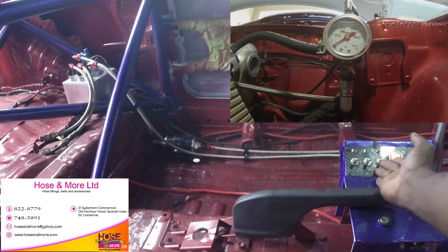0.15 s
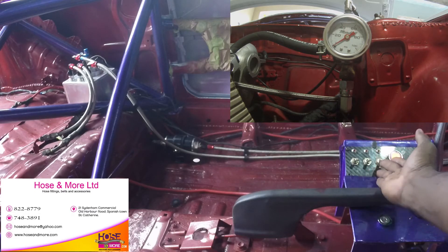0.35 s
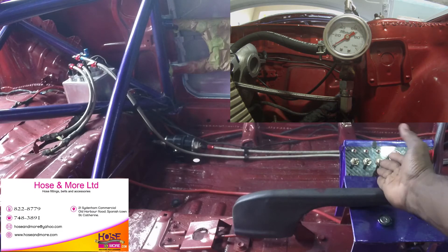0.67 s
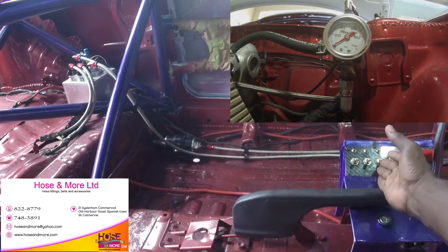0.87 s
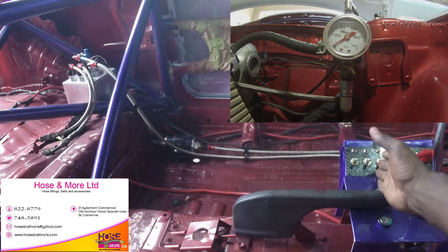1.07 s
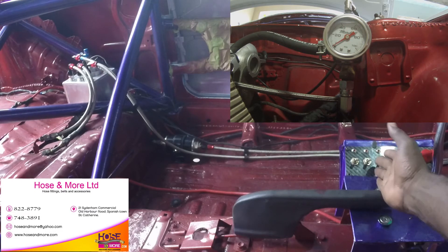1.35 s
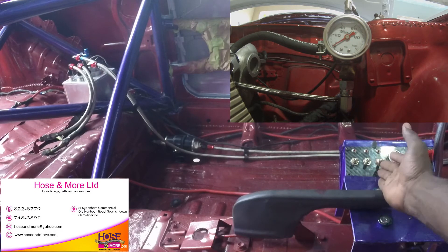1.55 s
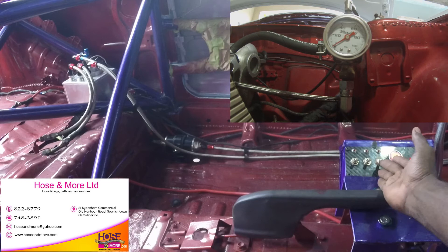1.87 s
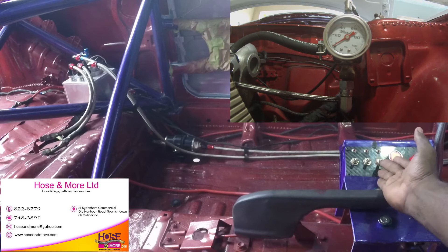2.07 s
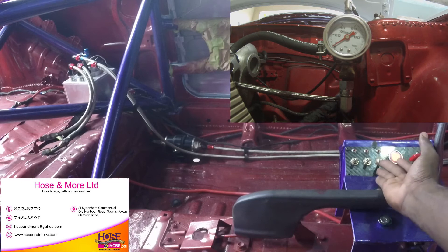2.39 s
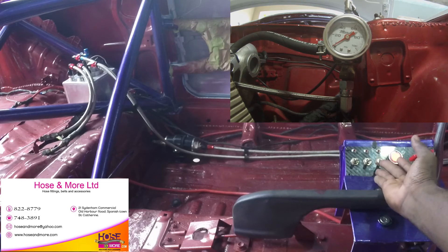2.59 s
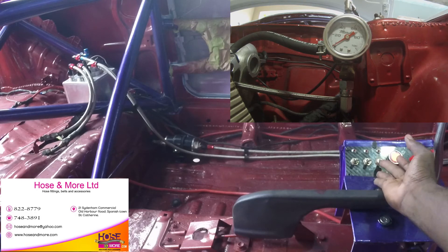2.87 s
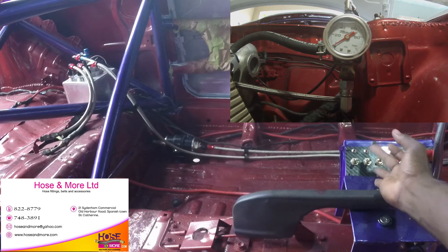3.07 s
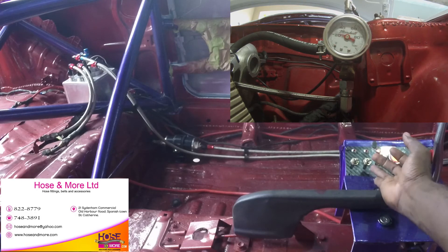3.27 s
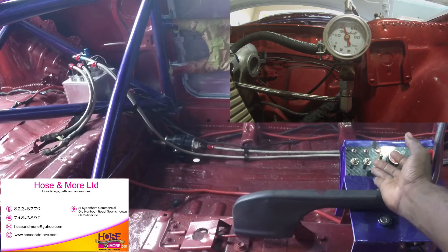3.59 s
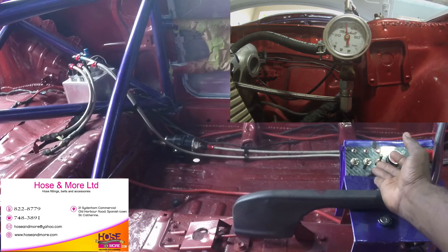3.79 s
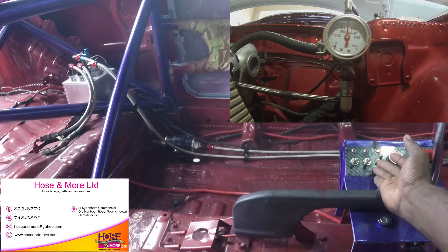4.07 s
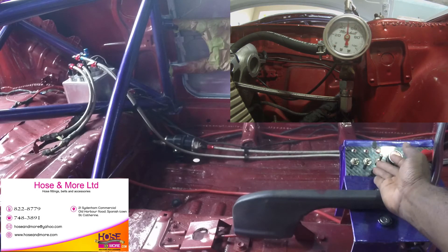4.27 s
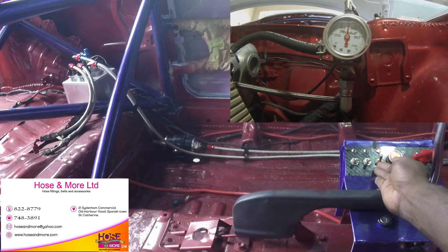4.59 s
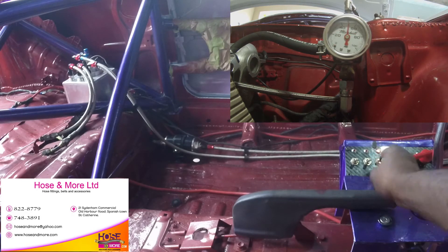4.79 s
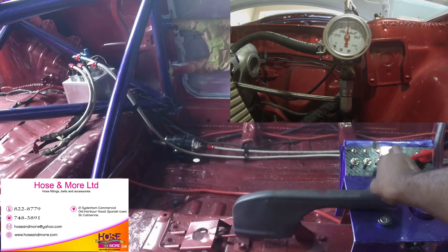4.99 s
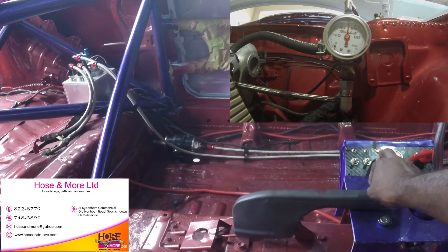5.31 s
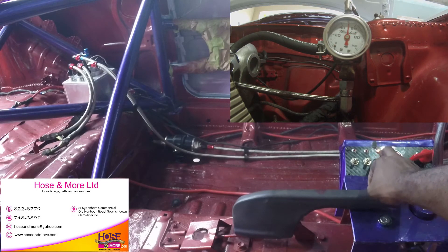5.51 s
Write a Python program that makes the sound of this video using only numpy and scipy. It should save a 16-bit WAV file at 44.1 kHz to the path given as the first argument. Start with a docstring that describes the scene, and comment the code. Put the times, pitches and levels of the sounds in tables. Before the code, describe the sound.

Quiet workshop rumble, a hollow knock and a heavy echoing thud, then a switch snaps and an electric fuel pump whines steadily to the end.

```python
"""An electric roller pump starts in a bare car shell in a workshop: fuel noise, throbbing five times a turn,
drives resonances of tank, floor panels and housing, and sines at shaft multiples whine. Air in the fuel hisses
at first. Before it come knocks on a hollow panel, a heavy thud with echoes from outside and a toggle switch:
ringing modes plus dying noise bands. Low puffs of air hit the microphone later; rumble and hum lie below."""
import sys
import numpy as np
from scipy import signal
from scipy.fft import rfft, irfft
from scipy.io import wavfile
from scipy.ndimage import uniform_filter1d

SR = 44100
rng = np.random.default_rng(int(sys.argv[2]) if len(sys.argv) > 2 else 0)


def transcribe(signal):
    """Save signal, clipped to [-1, 1], as a 16-bit WAV file at the path in sys.argv[1]."""
    frames = np.atleast_2d(signal).T
    limited = np.clip(frames, -1, 1)
    pcm = np.round(limited * 32767).astype(np.int16)
    wavfile.write(sys.argv[1], SR, pcm)


N = 249165
T = np.arange(N) / SR


def pump():
    """Pressure brings in churn and whine; the spinning rotor brings in panel drone and housing ringing."""
    # blend from airy to primed mode levels: time_s, blend_0_to_1
    blend_curve = [(3.2, 0), (3.5, 0.42), (3.7, 0.97), (4.2, 0.82), (4.6, 0.77)]
    pump_on_s, pressure_rise_s, spin_rise_s, air_clears_s = 3.028, 0.073, 0.037, 0.75
    age_s = np.maximum(T - pump_on_s, 0)
    pressure = (1 - np.exp(-age_s / pressure_rise_s)) ** 2.16
    spinning = 1 - np.exp(-age_s / spin_rise_s)
    blend = np.clip(curve(blend_curve), 0, 1)
    bubbles = np.exp(-(age_s / air_clears_s) ** 2)

    turns = shaft_turns()
    throb = 1 + .15 * np.cos(2 * np.pi * 5 * turns) + .05 * np.cos(2 * np.pi * turns)
    noise = rng.standard_normal((4, N)) * throb

    fluid = fuel_churn(noise, age_s, blend) + (1.35 - 0.56 * bubbles) * shaft_whine(turns)
    metal = low_panel(noise) + upper_panel(noise) + pump_housing(noise, blend, bubbles)
    return pressure * fluid + spinning * metal + air_hiss(noise[3], age_s, bubbles)


def shaft_turns():
    """Turns since the start: the integral of shaft speed, which hunts slightly under load."""
    # mean shaft speed: time_s, speed_turns_per_s
    speed_curve = [(3.02, 30), (3.15, 47.8), (3.5, 47.36), (4.1, 47.03), (4.7, 46.93), (5.1, 46.85),
                   (5.65, 46.82)]
    return np.cumsum(curve(speed_curve) * (1 + .0015 * drift(6))) / SR


def fuel_churn(noise, age_s, blend):
    """Churning fuel drives tank and bracket modes, which gather late, over a broad bed between them."""
    # tank and bracket: freq_hz, width_hz, airy_db, primed_db
    tank_modes = [(107, 38, -1.5, -8), (194, 29, -1.5, -28), (534.2, 15.5, 0, -0.5), (571, 3.8, -19, -37),
                  (663.4, 17.6, 1, -3), (677, 6.5, 15, -1.5), (804.5, 26, 0.5, -9.5), (866.5, 27, -3, -3.5),
                  (933, 39, -6.5, -5.5), (968, 20.5, -1, 6.5), (990, 2.9, 14, -5), (1041, 30.7, 1.5, 1.5),
                  (1287, 45, -18, -5), (1367, 21.6, -9.5, -3), (1408, 25, -15, -9.5),
                  (1725, 28, -10.5, -31), (1819, 74, -16.5, -14), (2003, 9.8, -35, -6),
                  (2208, 7.9, -33, -13.5), (2857, 83, -36, -18), (3530, 7.8, -56, -18)]
    # bed between the modes: freq_hz, density_db_per_hz
    bed_spectrum = [(35, -43), (60, -8.5), (150, -11), (240, -9.5), (420, -3), (610, -9), (750, -14.5),
                    (950, -9.5), (1500, -16), (2300, -19), (3900, -27.5), (5200, -31), (5800, -29),
                    (6900, -36), (7400, -34.5), (15500, -74)]
    tank_db, bed_db, tank_wait_s, tank_swell_s = -8.5, -31, .06, .15
    swell = np.clip((age_s - tank_wait_s) / tank_swell_s, .3, 1)
    tank = from_db(tank_db) * swell * shaken(tank_modes, noise, blend, wander_db=1)
    return tank + from_db(bed_db) * colour(noise[2], bed_spectrum)


def shaft_whine(turns):
    """Sines locked to multiples of the shaft speed, each wavering in level."""
    # whine lines: multiple_of_shaft_speed, relative_rms_db
    whine_lines = [(3, -45), (5, -45), (10, -52), (15, -56), (18, -55), (25, -46), (30, -48), (35, -54),
                   (44, -58), (47, -53), (48, -56), (50, -54), (61, -61), (75, -62), (80, -66), (89, -66),
                   (94, -68), (100, -63), (105, -62), (111, -64), (115, -63)]
    whine = np.zeros(N)
    for order, level_db in whine_lines:
        gain = from_db(level_db + 2.1 * drift(5.1)) * np.sqrt(2)
        whine += gain * np.sin(2 * np.pi * (order * turns + rng.random()))
    return whine


def low_panel(noise):
    """Low floor-panel resonances drone with an uneven level."""
    # panel modes: freq_hz, width_hz, level_db
    low_modes = [(297.4, 14.7, -12.5), (321, 5.5, -16.5), (336, 8.9, 2.5), (350.4, 8, -3)]
    # drone level: time_s, level_db
    low_level = [(3.06, -42), (3.11, -30.5), (3.3, -27), (3.36, -29), (3.41, -14.5), (3.46, -32.5),
                 (3.545, -17.5), (3.66, -31), (3.82, -22), (4.08, -28.5), (4.3, -29), (4.52, -30.5),
                 (4.68, -21), (4.76, -26.5), (5.3, -26), (5.55, -34.5), (5.65, -23.5)]
    return from_db(curve(low_level)) * panel_drone(low_modes, noise)


def upper_panel(noise):
    """Upper floor-panel resonances drone with an uneven level."""
    # panel modes: freq_hz, width_hz, level_db
    upper_modes = [(394.5, 26, -2), (418.9, 8.1, 6), (443, 14, -5)]
    # drone level: time_s, level_db
    upper_level = [(3.1, -35), (3.25, -32), (4.05, -33.5), (4.22, -23.5), (4.3, -32), (4.5, -29.5),
                   (4.8, -30), (5.25, -33.5), (5.42, -34), (5.55, -30.5)]
    return from_db(curve(upper_level)) * panel_drone(upper_modes, noise)


def pump_housing(noise, blend, bubbles):
    """Sharp treble modes of the housing; most of the higher ones fade as the air clears."""
    # housing: freq_hz, width_hz, airy_db, clear_db
    housing_modes = [(4050, 50, -31, -36), (4414, 50, -27, -36), (4690, 25, -34, -29), (4915, 30, -30, -24),
                     (5100, 70, -28, -30), (5208, 30, -30, -26), (5300, 50, -29, -29), (5385, 35, -32, -23),
                     (6010, 90, -30, -32), (6120, 120, -36, -31), (6620, 50, -36, -32),
                     (6780, 80, -34, -34), (7770, 60, -38, -35), (8780, 200, -31, -41),
                     (9080, 90, -35, -38), (9800, 150, -36, -41), (10200, 200, -38, -38),
                     (11580, 110, -28, -40), (11800, 90, -31, -42), (12170, 60, -38, -39),
                     (12680, 60, -40, -40), (13050, 120, -34, -38), (13450, 60, -34, -40),
                     (13880, 130, -28, -41), (14120, 60, -34, -40), (14600, 170, -31, -37)]
    level_db = -1 - 4 * (1.5 - blend)
    return from_db(level_db) * shaken(housing_modes, noise, 1 - bubbles, wander_db=1.5)


def air_hiss(noise, age_s, bubbles):
    """Froth noise that fades to a weaker hiss as the last bubbles leave."""
    # froth: freq_hz, density_db_per_hz
    froth_spectrum = [(3500, -22), (6000, -7), (8000, -1), (11000, 2), (15500, -2.5)]
    airy_db, clear_db, rise_s = -49.5, -55.5, .02
    level_db = clear_db + bubbles * (airy_db - clear_db)
    return np.minimum(age_s / rise_s, 1) * from_db(level_db) * colour(noise, froth_spectrum)


def switch():
    """Two bright snaps ring lever and plate; the sheet-metal box answers low."""
    # toggle leaves and lands: time_s, level_db, tilt_db_per_octave above 250 Hz
    snap_blows = [(3.0122, -26.5, 0), (3.0215, -30, -2.5)]
    # snap noise: freq_hz, density_db_per_hz
    snap_spectrum = [(150, -28), (250, -5), (781, -4), (1100, -6), (1890, 0.5), (2850, -7), (3960, -2.5),
                     (5310, -12), (5890, -28), (9070, -9.5), (15500, -31)]
    # snap noise decay: freq_hz, t60_s
    snap_decay = [(250, 0.43), (2000, 0.17), (6000, 0.14), (15000, 0.13)]
    # lever and plate: freq_hz, level_db, t60_s
    toggle_modes = [(796, -2, 0.17), (1217, 2, 0.11), (1750, -3, 0.074), (2540, -18, .08),
                    (3170, 0.5, 0.06), (3810, -1, 0.076), (4479, -16, 0.063), (5440, -4.5, 0.081),
                    (5570, -12, .06), (8260, -3, 0.037), (10500, -9, .03)]
    # sheet-metal box: freq_hz, level_db, t60_s
    box_modes = [(117, -20, 0.12), (156.5, -25, 0.25)]
    box_blows = [(3.030, 0, 0)]   # time_s, level_db, tilt_db_per_octave
    noise = dying_noise(snap_blows, snap_spectrum, snap_decay)
    lever = from_db(-4.5) * struck(snap_blows, toggle_modes, soft_hz=14100)
    return noise + lever + struck(box_blows, box_modes, soft_hz=247)


def thud():
    """A heavy door-like blow on a panel with a ringing latch; its echoes come back duller."""
    # thud and echoes: time_s, level_db, tilt_db_per_octave above 250 Hz
    thud_blows = [(1.373, -22, 0), (1.405, -23.5, -4), (1.438, -27.5, -3.5), (1.48, -44, -1.5),
                  (1.528, -39, -1), (1.603, -30.5, -5.5), (1.635, -37, -14), (1.7, -38, -11),
                  (1.79, -37, -9), (1.88, -39.5, -12)]
    # heavy panel: freq_hz, level_db, t60_s
    body_modes = [(32.8, 0, 0.17), (49, 2.5, 0.13), (75, -3, .12), (150, -6, .1), (218, -11, .1),
                  (294, -11, 0.067), (430, -12, .08)]
    # thud noise: freq_hz, density_db_per_hz
    thud_spectrum = [(12, -30), (20, -1), (106, -9), (140, -1.5), (180, -13.5), (333, -12), (452, -12),
                     (1340, -30.5), (1450, -34), (1870, -32), (3750, -45.5), (9390, -47.5), (15500, -89)]
    # thud noise decay: freq_hz, t60_s
    thud_decay = [(25, 0.95), (100, 0.53), (400, 0.35), (1000, 0.49), (3000, 0.11), (10000, 0.14)]
    # blows on the latch: time_s, level_db, tilt_db_per_octave above 250 Hz
    latch_blows = [(1.373, 0, 0.5), (1.532, -16, -4)]
    # latch metal: freq_hz, level_db, t60_s
    latch_modes = [(1900, -36, 0.066), (2304, -57, .06), (2940, -36.5, 0.036), (5394, -49, 0.083),
                   (8091, -52, .04), (9500, -48, .04)]
    push = struck(thud_blows, body_modes, soft_hz=350)
    noise = dying_noise(thud_blows, thud_spectrum, thud_decay, attack_cycles=0.88)
    return push + noise + struck(latch_blows, latch_modes, soft_hz=12000)


def knocks():
    """A hollow panel rings under a scatter of reflections."""
    # knocks: time_s, level_db, tilt_db_per_octave above 250 Hz
    knock_blows = [(.9322, -22, 0), (.975, -38, -1), (1.155, -34, -8), (1.18, -37, -8), (2.609, -37, -1)]
    # hollow panel: freq_hz, level_db, t60_s (struck() limits it to 0.4 s)
    knock_modes = [(678, -8, 0.15), (770, 6, 0.089), (932, 1, 0.21), (1110, 4.5, 0.07), (1470, -14, 0.98),
                   (1840, -29, 0.33), (2310, -21, 0.25), (2860, -10, 0.13), (3332, -37, 0.26)]
    # reflections: freq_hz, density_db_per_hz
    knock_spectrum = [(88, -36), (200, -16), (500, -10), (900, -9), (1400, -8), (2200, -21.5), (3300, -42),
                      (4300, -77), (9000, -65), (19800, -100)]
    # reflection decay: freq_hz, t60_s
    knock_decay = [(150, 0.36), (1000, 0.23), (3000, 0.041), (9000, .1)]
    rings = struck(knock_blows, knock_modes, soft_hz=1800)
    scatter = dying_noise(knock_blows, knock_spectrum, knock_decay, attack_cycles=1.7)
    return from_db(-11.5) * rings + from_db(-6.0) * scatter


def puffs():
    """Lumps of low turbulence on the microphone port."""
    # puffs: centre_s, level_db, half_length_s (to 1/e)
    puff_lumps = [(4.727, -28, 0.0084), (4.764, -20.5, 0.012), (4.834, -18, 0.025), (4.929, -21.5, 0.019),
                  (5.018, -27, 0.011), (5.11, -38, .02)]
    lumps = sum(from_db(db) * np.exp(-((T - s) / half_s) ** 2) for s, db, half_s in puff_lumps)
    low = band_pass(rng.standard_normal(N), 28, 75)
    return lumps * rms_one(np.tanh(rms_one(low)))


def workshop():
    """Noise floor of workshop and far traffic, with two wavering hums from narrow resonances."""
    # noise floor: freq_hz, density_db_per_hz
    air_spectrum = [(8.8, -45), (15, -10.5), (64, -5), (81, -19), (111, -10), (158, -20), (199, -19),
                    (230, -25.5), (335, -23), (366, -24), (399, -26.5), (518, -28), (3630, -41),
                    (13400, -60), (15500, -73)]
    # hums: freq_hz, width_hz, rms_db
    hum_modes = [(29.4, 7.7, -50.5), (59.7, 9, -49.5)]
    hum = sum(from_db(db) * rms_one(resonate(rng.standard_normal(N), hz, width_hz))
              for hz, width_hz, db in hum_modes)
    return from_db(-48 + 0.36 * drift(0.5)) * colour(rng.standard_normal(N), air_spectrum) + hum


def panel_drone(modes, noise):
    """Noise through panel modes, partly evened in level; rms 1."""
    drone = np.zeros(N)
    for k, (hz, width_hz, level_db) in enumerate(modes):
        drone += from_db(level_db) * resonate(resonate(noise[k % 2], hz, width_hz), hz, 8.5 * width_hz)
    return steadied(drone, share=0.39)


def shaken(modes, noise, blend, wander_db):
    """Noise through sharp modes; bubbles change the fuel's load on the metal, so levels move between two states."""
    out = np.zeros(N)
    for k, (hz, width_hz, first_db, last_db) in enumerate(modes):
        level_db = first_db + blend * (last_db - first_db) + wander_db * drift(1.3)
        out += from_db(level_db) * resonate(resonate(noise[k % 2], hz, width_hz), hz, 6.6 * width_hz)
    return out


def struck(events, modes, soft_hz):
    """Every blow, softened by the contact, rings every mode with a strength of its own."""
    at = [round(e[0] * SR) for e in events]
    out = np.zeros(N)
    for hz, mode_db, t60_s in modes:
        octaves = max(np.log2(hz / 250), 0)
        clicks = np.full(N, 1e-18)   # tiny offset keeps the filter out of denormals
        clicks[at] = [from_db(blow_db + mode_db + tilt_db * octaves + rng.normal(0, 2))
                      for _, blow_db, tilt_db in events]
        r = from_db(-60 / (np.clip(t60_s, .01, .4) * SR))
        w = 2 * np.pi * hz / SR
        out += signal.lfilter([0, np.sin(w)], [1, -2 * r * np.cos(w), r * r], clicks)
    return signal.sosfilt(signal.butter(2, min(soft_hz, 18000), fs=SR, output="sos"), out)


def dying_noise(events, spectrum, t60s, attack_cycles=0.78):
    """Blows as noise in half-octave bands; each swells over about a cycle and dies at its own pace."""
    first_s, last_s = events[0][0], events[-1][0]
    start = round(first_s * SR) - 4410
    size = min(N - start, round((last_s - first_s + 1) * SR))
    t = T[start:start + size]
    edges_hz = 20 * 2 ** np.arange(0, 10, .5)
    white = rng.standard_normal((2, size))
    out, power = np.zeros(N), 0
    for k, (low_hz, high_hz) in enumerate(zip(edges_hz, edges_hz[1:])):
        hz = np.sqrt(low_hz * high_hz)
        band = band_pass(white[k % 2], low_hz, high_hz)
        band_db, t60_s = at_hz(spectrum, hz), at_hz(t60s, hz)
        power += from_db(2 * band_db) * (high_hz - low_hz) / (SR / 2)
        for s, level_db, tilt_db in events:
            age_s = np.maximum(t - s, 0)
            lost_db = tilt_db * max(np.log2(hz / 250), 0)
            fall = from_db(level_db + lost_db + band_db - 60 * age_s / t60_s)
            out[start:start + size] += band * fall * (1 - np.exp(-age_s * hz / attack_cycles))
    return out / np.sqrt(power)


def resonate(x, hz, width_hz):
    """Two-pole resonance with gain 1 at its peak."""
    r = np.exp(-np.pi * np.clip(width_hz, 2, 2000) / SR)
    poles = [1, -2 * r * np.cos(2 * np.pi * hz / SR), r * r]
    return signal.lfilter(np.array([1, 0, -1]) * (1 - r * r) / 2, poles, x)


def band_pass(x, low_hz, high_hz):
    """Butterworth band-pass."""
    return signal.sosfilt(signal.butter(2, [low_hz, high_hz], "band", fs=SR, output="sos"), x)


def colour(x, spectrum):
    """Shape a steady drive by a spectrum; rms 1."""
    hz = np.maximum(np.arange(N // 2 + 1) * SR / N, 1)
    return rms_one(irfft(rfft(x) * from_db(at_hz(spectrum, hz)), N))


def steadied(x, share):
    """Even out a share of the random surging; rms 1."""
    power = uniform_filter1d(x ** 2, size=2500) + 1e-12
    return rms_one(x / power ** (share / 2))


def drift(rate_hz):
    """Slow random wander of rms 1: low-passed noise, drawn every 40 samples."""
    r = np.exp(-80 * np.pi * rate_hz / SR)
    white = rng.standard_normal(N // 40 + 2002)
    slow = signal.lfilter([1], [1, -2 * r, r * r], white)[2000:]   # settled part only
    return np.interp(np.arange(N) / 40, np.arange(len(slow)), rms_one(slow))


def curve(rows):
    """Read a (time_s, value) table at every sample."""
    s, value = np.transpose(rows)
    return np.interp(T, s, value)


def at_hz(points, hz):
    """Read a table on a log-frequency axis."""
    table_hz, value = np.transpose(points)
    return np.interp(np.log(hz), np.log(table_hz), value)


def from_db(db):
    """Decibels to gain."""
    return 10 ** (np.asarray(db) / 20)


def rms_one(x):
    """Scale to unit rms."""
    return x / np.sqrt(np.mean(x ** 2) + 1e-20)


def scene():
    """All sources at one microphone."""
    return (pump() + switch() + thud() + knocks() + puffs() + workshop())[None]


def record(dry):
    """Steep elliptic low-pass at 15270 Hz."""
    return signal.sosfilt(signal.ellip(12, .5, 70, 15270, fs=SR, output="sos"), dry)


dry = scene()
out = record(dry)
transcribe(out)
```